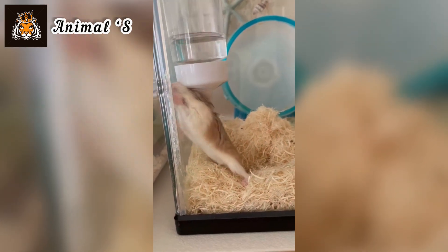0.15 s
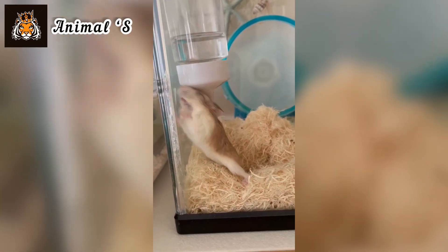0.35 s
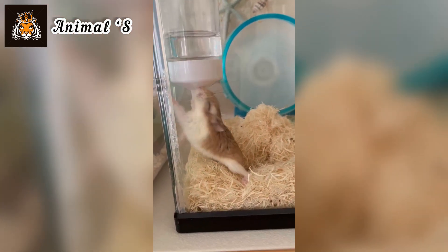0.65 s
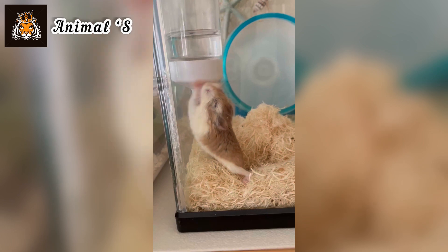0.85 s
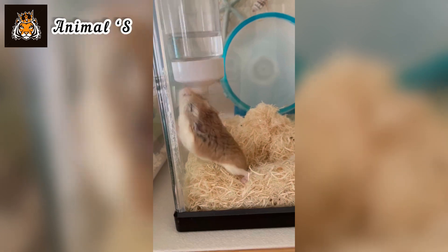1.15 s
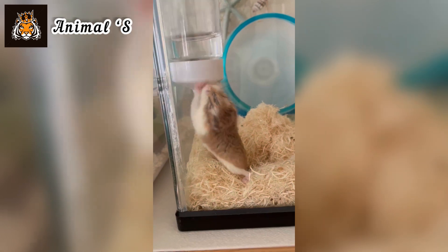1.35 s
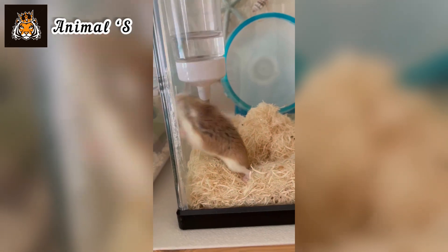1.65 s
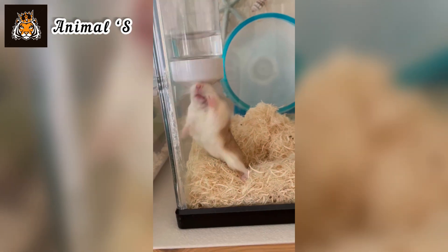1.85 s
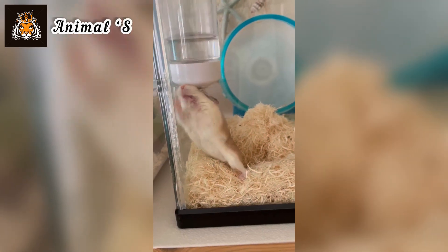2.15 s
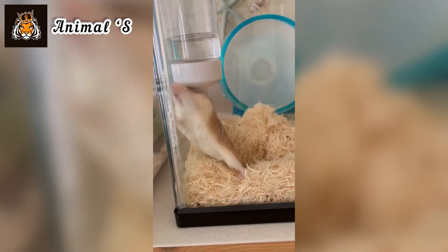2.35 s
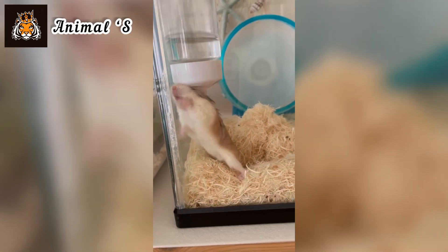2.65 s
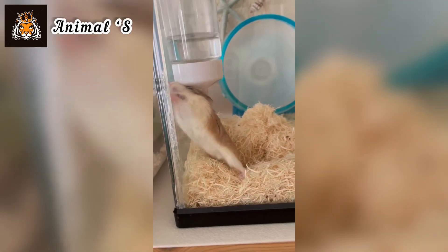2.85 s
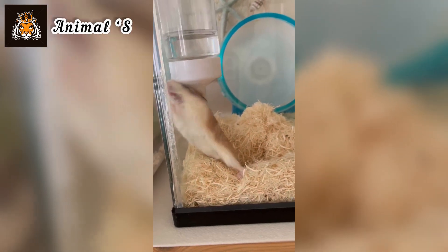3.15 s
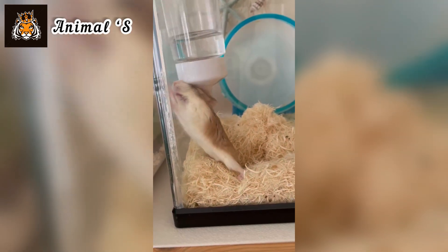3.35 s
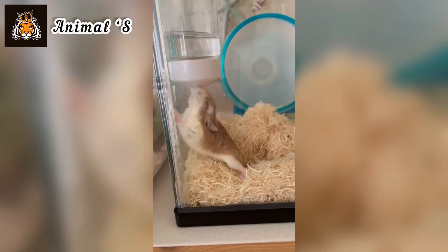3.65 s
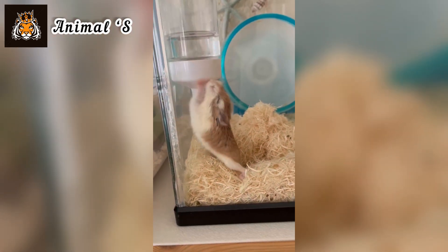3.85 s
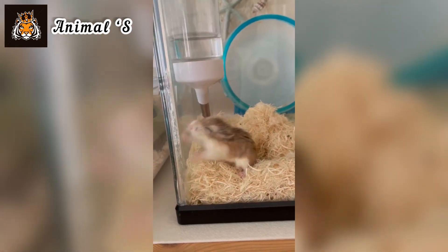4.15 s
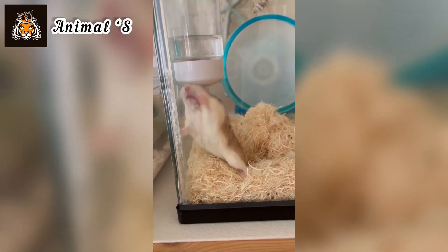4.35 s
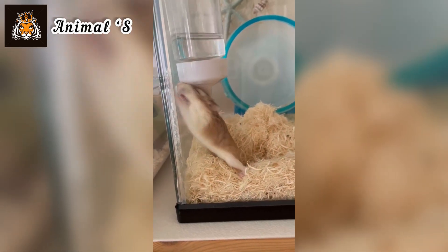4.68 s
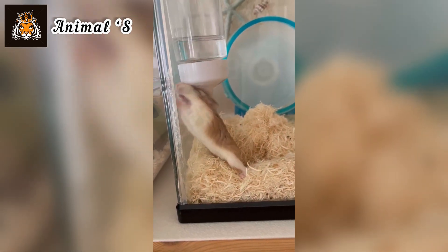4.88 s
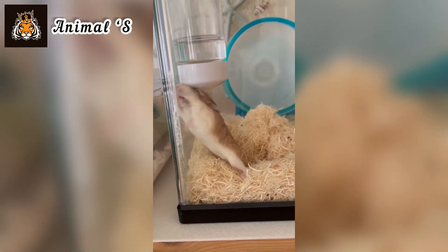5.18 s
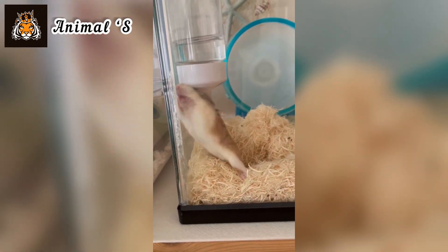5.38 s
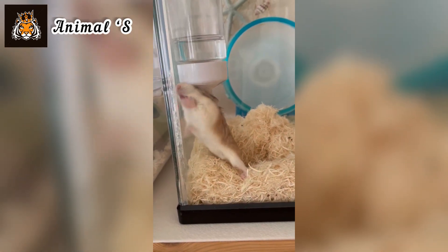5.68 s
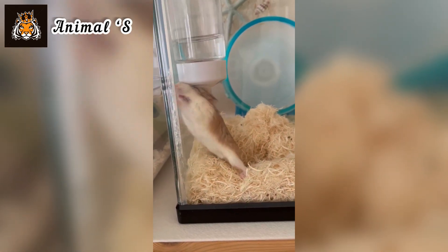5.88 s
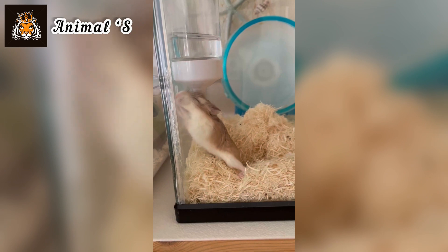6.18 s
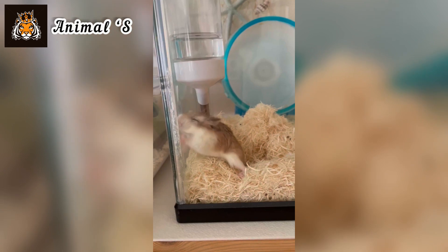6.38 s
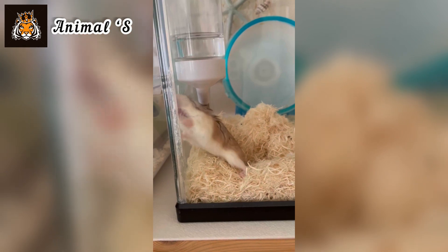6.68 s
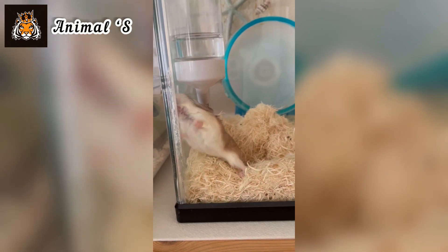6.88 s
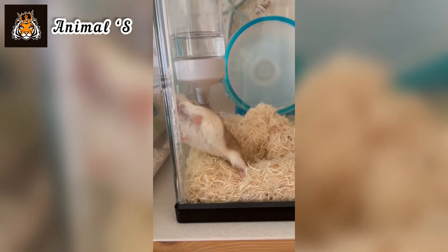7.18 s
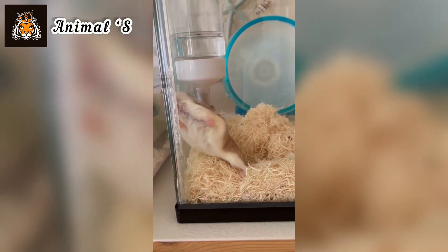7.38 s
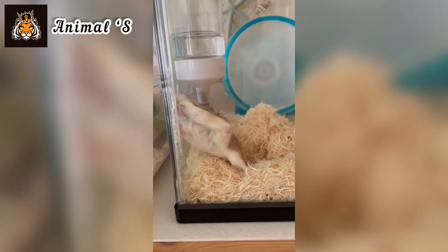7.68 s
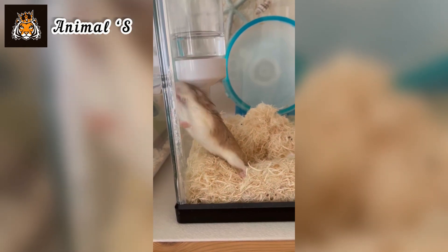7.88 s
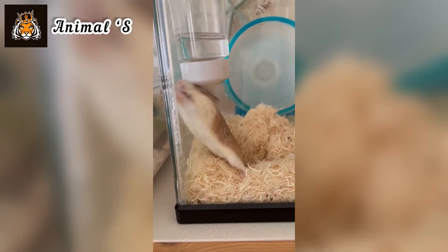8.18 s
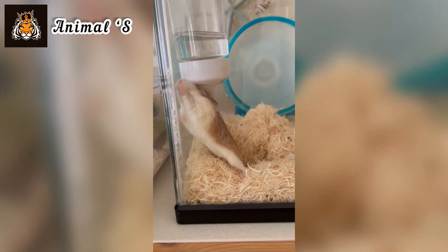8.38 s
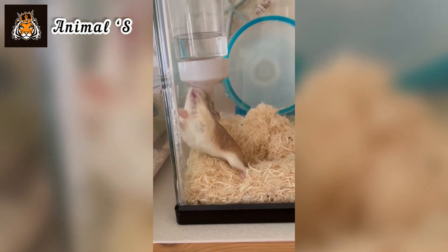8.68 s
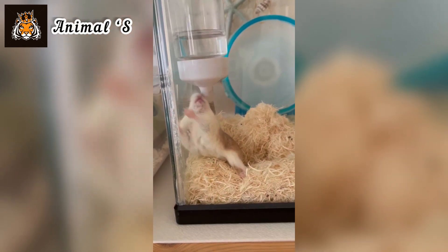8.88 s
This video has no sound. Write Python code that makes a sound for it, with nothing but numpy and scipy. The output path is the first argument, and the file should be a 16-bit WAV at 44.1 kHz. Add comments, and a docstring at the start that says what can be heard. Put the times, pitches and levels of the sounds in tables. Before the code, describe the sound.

Hollow plastic knocks and clacks at irregular intervals as a hamster bumps a cage water bottle, with faint scratchy licks over a low room hum.

```python
"""Hamster at a water bottle

A hamster stands on its bedding and licks at the spout of a water bottle in a plastic cage.
Knocks, taps and shoves excite decaying modes of wall and bottle, with noise for the crack and clatter.
Licks and scratchy strokes are bursts of tiny slips that ring the spout; sparse grains make the bedding crackle.
A faint tone sags once; shaped noise gives the quiet, humming room. The microphone is close and nearly mono."""
import sys
import numpy as np
from scipy import signal
from scipy.fft import rfft, irfft, next_fast_len
from scipy.io import wavfile
from scipy.ndimage import uniform_filter1d

SR = 44100
rng = np.random.default_rng(int(sys.argv[2]) if len(sys.argv) > 2 else 0)


def wrap_up_sound(samples):
    """Save the sound to the file named by the first command line argument, as 16-bit audio."""
    columns = np.atleast_2d(samples).T
    # keep every value between -1 and 1, then stretch to whole-number steps
    tamed = np.clip(columns, -1, 1)
    steps = np.round(tamed * 32767).astype(np.int16)
    wavfile.write(sys.argv[1], SR, steps)


N = 398223
RING = np.arange(int(.6 * SR)) / SR  # time axis of one sound, s

# Event levels are relative: each kind of sound adds its own gain.
# The bottle swings into the wall: start_s, level_db, tap_lead_s, tap_minus_knock_db,
# rattle_minus_knock_db, rebound_delay_s (leads and delays up to SHORTEST_GAP_S give no separate event)
KNOCKS = [(0.117, -26.5, .084, -9, -30, 0.068), (0.485, -30.5, 0.00087, 0, -27, 0.022),
          (1.223, -11, .016, -9, -25, 0.06), (1.754, -7.5, .010, -9.5, -25, 0.05),
          (1.845, -27, 0, 0, -21.5, 0.00059), (2.577, -19, .032, -13, -26, .046),
          (3.087, -23.5, .02, -13.5, -23, 0), (3.456, -22.5, .069, -5, -21.5, 0.064),
          (4.196, -14, .03, -14, -26.5, 0.0005), (4.734, -16.5, .036, -15, -23.5, 0.04),
          (5.081, -36.5, 0.001, 4, -23, 0.0075), (5.732, -21, .046, -14, -21.5, 0),
          (6.08, -21.5, .078, -10.5, -23, 0), (8.074, -36.5, 0.0021, 1, -24, 0.0026),
          (8.437, -23.5, .073, -9, -25.5, .033)]
# The animal shoves the bottle sideways: start_s, level_db
SHOVES = [(0.541, -29.5), (0.88, -23.5), (0.922, -22), (1.408, -19.5), (1.464, -23), (1.998, -25),
          (3.733, -33.5), (3.924, -14.5)]
# The spout is tapped lightly, without a swing: start_s, level_db, brightness_db_per_octave
LIGHT_TAPS = [(2.219, -31.5, -4.5), (2.467, -37, 7), (2.944, -46.5, 5), (3.184, -35.5, -0.5),
              (3.551, -29, -2), (3.575, -33, -4), (5.216, -39.5, -3), (5.509, -29, 3), (5.533, -43.5, 2.5),
              (5.877, -33.5, 1), (8.6, -42, -7), (8.736, -44.5, -4), (8.999, -40, -2.5)]
# Single scratchy strokes at the spout and cage, loud and faint, some of them licks:
# time_s, level_db, length_s
SINGLE_STROKES = [(0.209, -51.5, 0.013), (0.233, -57.5, 0.0057), (0.3485, -48.5, 0.014), (0.384, -51, .029),
                  (0.71, -57.5, 0.012), (1.3857, -44.5, 0.024), (2.217, -52.5, 0.031), (2.344, -52, 0.032),
                  (2.78, -41.5, 0.018), (2.884, -53.5, 0.015), (2.93, -54.5, 0.011), (3.275, -53, 0.022),
                  (4.5086, -51.5, 0.022), (4.839, -53, .014), (4.9234, -51.5, 0.013), (5.285, -51, 0.014),
                  (5.415, -52, .024), (5.556, -55, 0.019), (5.913, -51, .021), (6.334, -54, 0.018),
                  (7.192, -60, 0.011), (7.42, -60, .008), (7.99, -61.5, 0.018), (8.161, -59, .01)]
# Bouts of licking: start_s, end_s, level_db
LICK_BOUTS = [(2.181, 2.75, -60.5), (4.429, 5.2, -61), (6.157, 6.3, -59), (6.991, 7.75, -65)]
# The animal shifts its feet: middle_s, half_length_s, level_db
STIRS = [(0.101, .3, -72), (2.042, 0.6, -90), (3.337, 0.21, -70.5), (5.5, 1, -83), (8.407, 0.18, -77)]
# Modes of cage wall and bottle: pitch_hz, t60_s, knocked_db, tapped_db, shoved_db (relative levels)
CAGE_MODES = [(132.6, 0.4, -16, -24, -1), (175.56, 0.38, -2, -13.5, -1.5), (191.5, 0.19, 3.5, -19, -17.5),
              (238.3, 0.24, -6.5, -17, 0.5), (309, 0.26, -14, -20.5, -0.5), (324, 0.21, 0, -13.5, -2.5),
              (361.8, 0.091, 3, -8.5, 5), (396.4, 0.057, 5.5, -13.5, -15.5), (438.7, .18, -7, -8.5, -5.5),
              (501.6, 0.17, -7.5, -8.5, 1.5), (532.7, 0.17, -6, -8.5, -6), (580, 0.016, 12.5, -14.5, -12),
              (657, 0.038, 6, -4.5, -26), (684, 0.25, -17.5, -9, -18), (760, 0.089, -3.5, -7.5, -10),
              (828, 0.17, -9, -10, -20), (876, 0.15, -9.5, -6, -18), (952.4, 0.23, -15, -13.5, -12),
              (1058, 0.12, -23.5, -6, -5), (1138, 0.11, -14.5, -2.5, -9.5), (1275, 0.14, -18.5, -8.5, -35),
              (1434, 0.021, -1, -1, -14), (1601, 0.054, -12, -4, -3.5), (2298, 0.026, -3.5, -2, -12)]
# Modes of the metal spout: pitch_hz, t60_s, relative_level_db
SPOUT_MODES = [(4135, 0.071, -0.5), (4255, 0.076, 5), (5350, 0.082, -15), (5550, 0.074, 1.5),
               (5587, 0.053, -45), (7560, 0.12, 2), (8130, 0.082, -1)]
# Spectrum of the wall's dense upper resonances: frequency_hz, gain_db
CLATTER = [(250, -12.5), (700, 14), (1100, 6.5), (1400, -6.5), (1700, -5), (2000, -15), (2400, -9),
           (3600, -19.5), (6000, -25), (12000, -41.5)]
# Treble colour of scratches, cracks and crackle as the microphone hears them, with a notch near 10 kHz:
# frequency_hz, gain_db
TREBLE_COLOUR = [(300, -21), (1200, 5.5), (2500, -1), (3400, 1), (4400, -0.5), (5400, 3.5), (6300, -4),
                 (7700, -1), (9000, -6), (10000, -26), (11300, -6), (13500, -8), (16000, -19)]
# Spectrum of the room's air noise: frequency_hz, relative_density_db
ROOM_SPECTRUM = [(20, -48.5), (35, -23.5), (55, -5.5), (90, -1.5), (120, -12), (220, -10), (270, -15),
                 (380, -12.5), (600, -18.5), (900, -24.5), (1400, -32), (2900, -41.5), (3700, -51.5),
                 (8000, -59.5), (10000, -59.5), (13000, -56.5), (15500, -63)]
# Low hum of the room: pitch_hz, width_hz, level_db
HUM = [(56, 20, -65.5), (87.2, 25, -62)]
# Stereo width of the close sounds: frequency_hz, side_minus_mid_db
CLOSE_WIDTH = [(150, -82.5), (350, -41), (700, -13.5), (1400, -21.5), (2800, -10.5), (5000, -8.5),
               (14000, -15)]
# Stereo spread of the air noise: frequency_hz, side_gain_db
ROOM_WIDTH = [(60, -27), (110, -33.5), (200, -16), (380, -9.5), (700, -4), (1290, -5), (2380, -7.5),
              (4400, 2), (8120, -12), (15000, -1)]

SHORTEST_GAP_S = .004
LEAD_SCRAPE_DB, LEAD_SCRAPE_S = -21, 0.022  # the opening tap scrapes; level relative to it
REBOUND_DB = -13.5  # a rebound against its knock
RATTLE_S = 0.019  # length of the spout's rattle after a knock
RATTLE_LAG_S, RATTLE_LAG_POWER = .058, 0.5  # lag after the hardest knock, and how it follows the force
LICKS_PER_S, LICK_S = 9.9, 0.012
LICK_JITTER_S, LICK_SCATTER_DB = .005, 5
STILL_DB = -88.5  # the bedding between the stirs, on the scale of STIRS
ROOM_DB = -58  # rms of the air noise
TOP_HZ = 15700


def undb(db):
    """Decibels: the amplitude gain is ten to the twentieth part of the level."""
    return 10 ** (np.asarray(db) / 20)


def shape(x, gain):
    """Linear filtering: the spectrum is multiplied by a gain given as a function of frequency."""
    size = next_fast_len(2 * len(x))
    hz = np.maximum(np.fft.rfftfreq(size, 1 / SR), 1)
    return irfft(rfft(x, size) * gain(hz), size)[:len(x)]


def colour(x, points):
    """Minimum phase: folding the cepstrum makes a causal filter through (frequency_hz, gain_db) points."""
    hz, db = np.transpose(points)
    size = 2 ** 13
    curve_db = np.interp(np.log(np.fft.rfftfreq(size, 1 / SR) + 1), np.log(hz), db)
    cepstrum = irfft(np.log(undb(curve_db)))
    cepstrum[1:size // 2] *= 2
    cepstrum[size // 2 + 1:] = 0
    response = irfft(np.exp(rfft(cepstrum)))
    return signal.fftconvolve(x, response)[:len(x)]


def level(x, db):
    """Mean power: scale the signal to an rms level."""
    return x * undb(db) / np.sqrt(np.mean(x ** 2))


def peak(x, db):
    """Short-time power: scale the loudest 4 ms to an rms level."""
    return x * undb(db) / np.sqrt(uniform_filter1d(x ** 2, size=176).max())


def fade(t60):
    """Exponential decay: the amplitude falls by 60 dB in t60 seconds."""
    return np.exp(-np.log(1000) * RING / t60)


def noise(like):
    """White noise: independent Gaussian samples, as many as in the given signal."""
    return rng.standard_normal(len(like))


def add(track, s, x):
    """Superposition: mix a sound into the track at a time in seconds."""
    i = int(np.clip(s * SR, 0, N - 1))
    track[i:i + len(x)] += x[:N - i]


def swings():
    """Impact sequence: a tap and scrape may lead each knock; a rattle and perhaps a rebound follow."""
    taps, scrapes, rebounds = [], [], []
    hardest_db = max(row[1] for row in KNOCKS)
    for s, db, lead, lead_db, rattle_db, gap in KNOCKS:
        # a harder knock throws the loose spout further, so it falls back later
        lag = RATTLE_LAG_S * undb(db - hardest_db) ** RATTLE_LAG_POWER
        scrapes.append((s + lag, db + rattle_db, RATTLE_S))
        if lead > SHORTEST_GAP_S:
            taps.append((s - lead, db + lead_db))
            scrapes.append((s - lead, db + lead_db + LEAD_SCRAPE_DB, LEAD_SCRAPE_S))
        if gap > SHORTEST_GAP_S:
            rebounds.append((s + gap, db + REBOUND_DB))
    return taps, scrapes, rebounds


def by_force(hits, brightness, per_db):
    """Force and spectrum: brightness (dB per octave) falls as (start_s, level_db) hits get gentler."""
    hardest_db = max(db for _, db in hits)
    return [(s, db, brightness + per_db * (db - hardest_db)) for s, db in hits]


def cage_ring(modes, mode_db, steady_hz, lag_s, contact_hz, scatter_db=1.5):
    """Modal superposition: the wandering contact point reshuffles the modes, most above steady_hz."""
    size, turn = rng.standard_normal((2, len(modes)))
    pitch_hz = np.transpose(CAGE_MODES)[0]
    weights = undb(mode_db + scatter_db * size) * np.exp(1j * turn * pitch_hz / steady_hz)

    def strike(f):
        # bending waves are slower at low pitch (lag_s is the travel time at 1 kHz): a falling chirp
        travel = np.exp(-4j * np.pi * lag_s * np.sqrt(f * 10 ** 3))
        # a contact of finite length rounds the top
        return travel / (1 + 1j * f / contact_hz) ** 2

    ring = shape((weights @ modes).real, strike)
    ring = signal.sosfilt(signal.butter(4, contact_hz, fs=SR, output="sos"), ring)
    # a small panel radiates little deep bass
    return signal.sosfilt(signal.butter(4, 130, "high", fs=SR, output="sos"), ring)


def blows(table, mode_db, steady_hz, lag_s, contact_hz, gain_db, clatter_db, crack_db, crack_growth,
          tail_db, crack_rise_s=0.0058, build_s=0.00054):
    """Impact excitation: a blow rings the wall, sets off its dense resonances and cracks at the contact."""
    out = np.zeros(N)
    modes = np.array([fade(t60) * np.exp(2j * np.pi * hz * RING) for hz, t60, *_ in CAGE_MODES])
    modes = modes * (1 - np.exp(-RING / build_s))  # standing waves take a moment to build up
    hardest_db = max(row[1] for row in table)
    for s, db, brightness in table:
        force_db = db - hardest_db
        # gentler blows stay longer in contact and sound duller
        top_hz = contact_hz * undb(force_db) ** 0.31
        tilt = [(hz, brightness * np.log2(hz / 600)) for hz in (150, 600, 2400)]
        wall = colour(cage_ring(modes, mode_db, steady_hz, lag_s, top_hz), tilt)
        clatter_decay = fade(0.013) + undb(tail_db) * fade(0.23)
        clatter = colour(noise(RING) * clatter_decay, CLATTER)
        crack_envelope = (1 - np.exp(-RING / crack_rise_s)) * (fade(0.0237) + undb(-18.0) * fade(0.22))
        crack = colour(noise(RING) * crack_envelope, TREBLE_COLOUR)
        # the crack grows faster with force than the ring
        crack_level_db = db + crack_growth * force_db + crack_db
        blow = peak(wall, db + gain_db) + peak(clatter, db + clatter_db) + peak(crack, crack_level_db)
        add(out, s, blow)
    return out


def knocks(rebounds):
    """Hard impact: the swinging bottle meets the wall in a short, bright contact and may rebound."""
    hits = by_force([row[:2] for row in KNOCKS], brightness=-0.18, per_db=0.07)
    hits += by_force(rebounds, brightness=0.301, per_db=0.37)
    return blows(hits, np.transpose(CAGE_MODES)[2], steady_hz=1060, lag_s=0.001274, contact_hz=4070,
                 gain_db=-2.5, clatter_db=-18.0, crack_db=-29.5, crack_growth=0.38, tail_db=-4)


def taps(lead_taps):
    """Light impact: taps, before a swing or alone, favour the higher modes."""
    hits = by_force(lead_taps, brightness=-1.6, per_db=0.1) + LIGHT_TAPS
    return blows(hits, np.transpose(CAGE_MODES)[3], steady_hz=241, lag_s=0.00059, contact_hz=2650,
                 gain_db=-9.5, clatter_db=-19.5, crack_db=-35.5, crack_growth=0.58, tail_db=-1.0)


def shoves():
    """Sideways forcing: a shove of the bottle favours the lower modes."""
    hits = by_force(SHOVES, brightness=-3, per_db=0.28)
    return blows(hits, np.transpose(CAGE_MODES)[4], steady_hz=480, lag_s=0.000897, contact_hz=2600,
                 gain_db=-11.5, clatter_db=-23.5, crack_db=-38, crack_growth=0.78, tail_db=-9.5)


def licks():
    """Quasi-periodic forcing: the tongue works the spout nearly evenly; gives time_s, level_db, length_s."""
    strokes = []
    for start, end, db in LICK_BOUTS:
        for s in np.arange(start, end, 1 / LICKS_PER_S):
            late, strong = rng.standard_normal(2)
            strokes.append((s + LICK_JITTER_S * late, db + LICK_SCATTER_DB * strong, LICK_S))
    return strokes


def scratches(strokes, gain_db=-8, grain_hz=550, scatter_db=6, tail_db=-13, tail_t60=0.19,
              spout_db=-25, lead_s=0.0033):
    """Stick-slip friction: bursts of tiny slips swell and die, ring the spout and smear in the cage walls."""
    out = np.zeros(N)
    spout = sum(undb(db + spout_db) * fade(t60) * np.sin(2 * np.pi * hz * RING)
                for hz, t60, db in SPOUT_MODES)
    for s, db, length in strokes:
        slips = rng.random(len(RING)) < grain_hz / SR  # grain_hz: mean slips per second
        sizes = undb(scatter_db * np.clip(noise(RING), -2, 2)) * np.sign(noise(RING))
        stroke = RING / length
        burst = (slips * sizes + 0.043 * noise(RING)) * stroke * np.exp(-stroke ** 2)
        walls = noise(RING) * (fade(0.0091) + undb(tail_db) * fade(tail_t60))
        smeared = signal.fftconvolve(burst, walls + spout)[:len(RING)]
        add(out, s - lead_s, peak(colour(smeared, TREBLE_COLOUR), db + gain_db))
    return out


def bedding(grain_hz=70, scatter_db=3, gain_db=-4):
    """Granular noise: shavings crackle faintly under the feet, more while the animal shifts about."""
    t = np.arange(N) / SR
    stir = undb(STILL_DB) + sum(undb(db) * np.exp(-((t - s) / half) ** 2) for s, half, db in STIRS)
    sizes = undb(scatter_db * np.clip(rng.standard_normal(N), -2, 2))
    grains = (rng.random(N) < grain_hz / SR) * sizes  # grain_hz: mean grains per second
    tail = noise(RING) * (fade(0.03) + undb(-10.0) * fade(0.33))
    crackle = colour(signal.fftconvolve(grains, tail)[:N], TREBLE_COLOUR)
    return level(crackle, gain_db) * stir


def low_tone(start_s=7.85, start_hz=285, sag_hz_per_s=220, tone_db=-48.5, upper_ratio=1.52,
             upper_db=-10, attack_s=.012, hold_s=.085, release_s=.09):
    """Frequency glide: a faint, brief tone with one inharmonic upper partial sags in pitch."""
    out = np.zeros(N)
    envelope = np.interp(RING, np.cumsum([0, attack_s, hold_s, release_s]), [0, 1, 1, 0])
    phase = 2 * np.pi * np.cumsum(start_hz - sag_hz_per_s * RING) / SR
    partials = np.sin(phase) + undb(upper_db) * np.sin(upper_ratio * phase)
    add(out, start_s, undb(tone_db) * envelope * partials)
    return out


def widen(mid):
    """Decorrelation: early reflections reach the two ports differently, mostly in the treble."""
    size = next_fast_len(N + len(RING))
    reflections = rfft(noise(RING) * fade(.1), size)
    scattered = irfft(rfft(mid, size) * reflections / np.abs(reflections), size)[:N]  # phase only
    side = colour(scattered, CLOSE_WIDTH)
    return np.array([mid + side, mid - side])


def room():
    """Diffuse field: dull air noise comes from all round, and narrow bands of noise make a wavering hum."""
    air, across = (level(colour(rng.standard_normal(N), ROOM_SPECTRUM), ROOM_DB) for _ in range(2))
    hum = np.zeros(N)
    for hz, width, db in HUM:
        band = shape(rng.standard_normal(N), lambda f: 1 / (1 + (2 * (f - hz) / width) ** 2))
        hum += level(band, db)
    side = colour(across, ROOM_WIDTH)
    return np.array([air + hum + side, air + hum - side])


def scene():
    """Superposition: knocks, taps and shoves, then licks and scratches, bedding, tone and room."""
    lead_taps, scrapes, rebounds = swings()
    cage = knocks(rebounds) + taps(lead_taps) + shoves()
    friction = scratches(SINGLE_STROKES + scrapes + licks())
    return widen(cage + friction + bedding() + low_tone()) + room()


def record(dry):
    """Band limiting: the recorder's steep low-pass cuts the top."""
    return signal.sosfilt(signal.ellip(8, .2, 70, TOP_HZ, fs=SR, output="sos"), dry)


dry = scene()
out = record(dry)
wrap_up_sound(out)
```